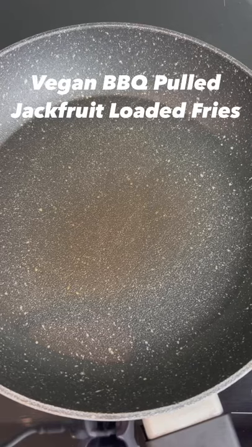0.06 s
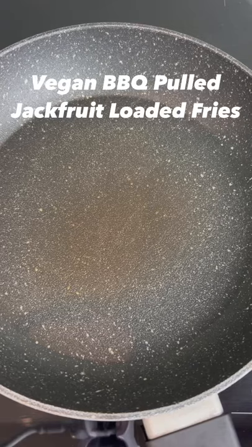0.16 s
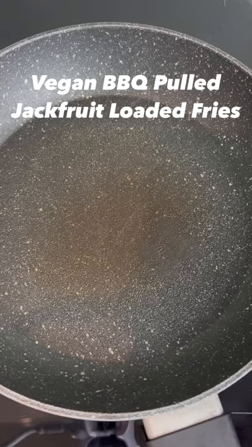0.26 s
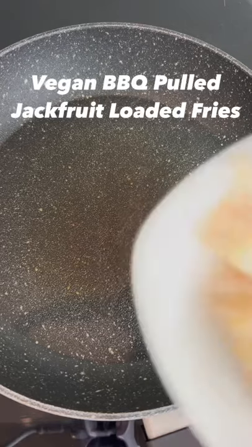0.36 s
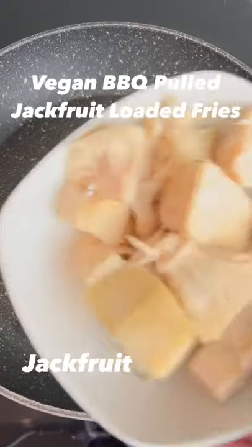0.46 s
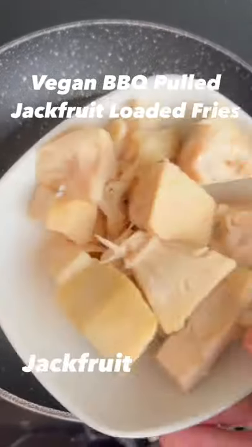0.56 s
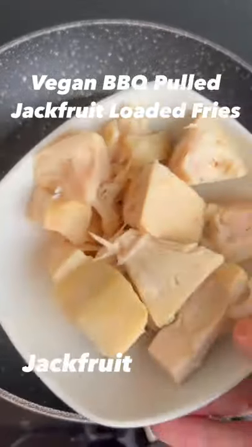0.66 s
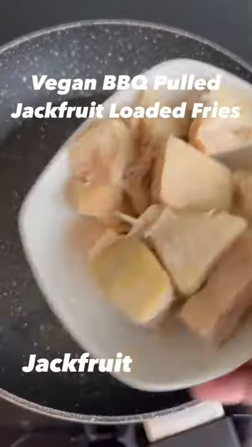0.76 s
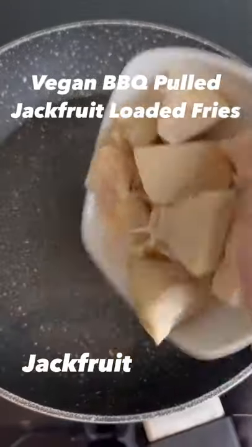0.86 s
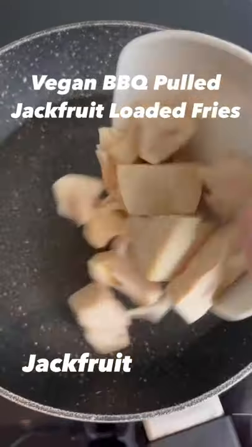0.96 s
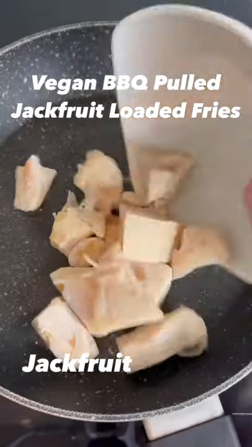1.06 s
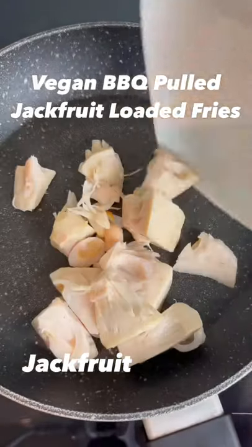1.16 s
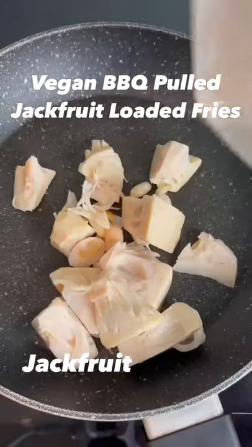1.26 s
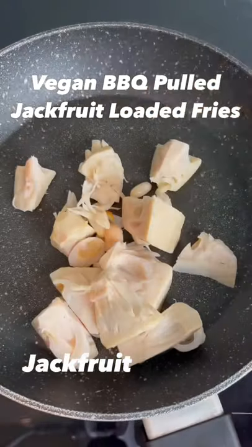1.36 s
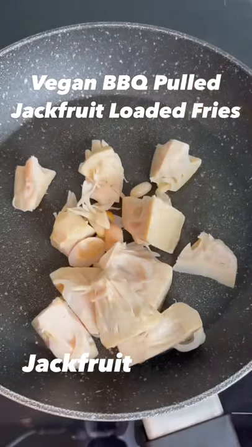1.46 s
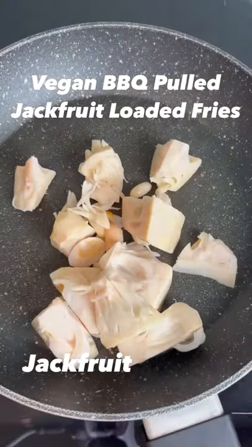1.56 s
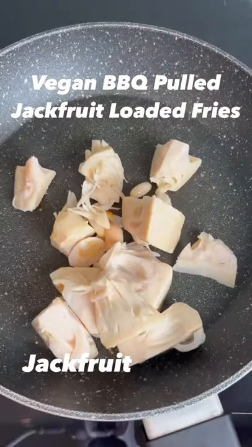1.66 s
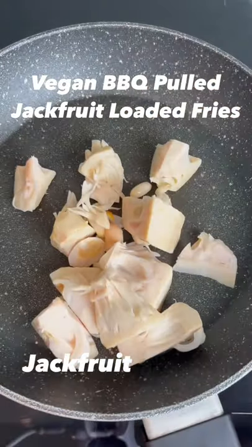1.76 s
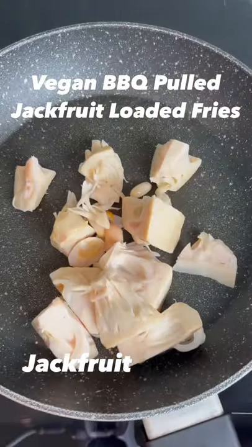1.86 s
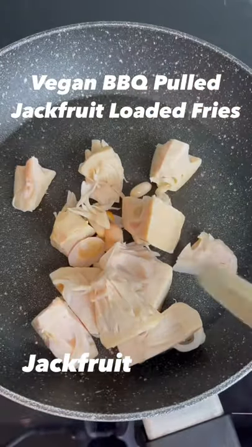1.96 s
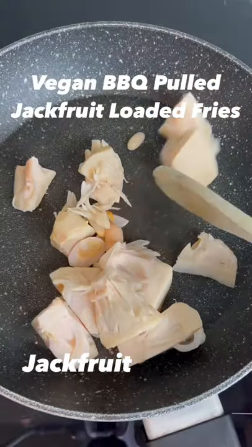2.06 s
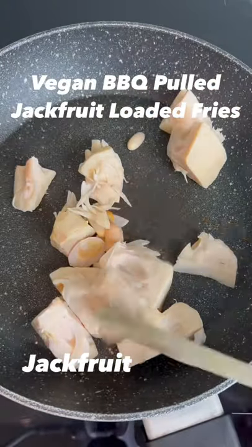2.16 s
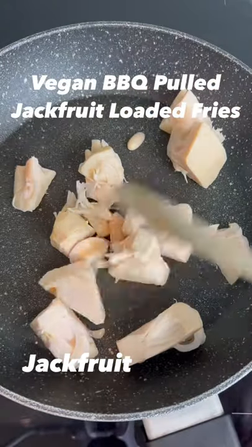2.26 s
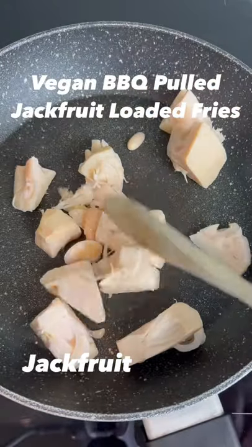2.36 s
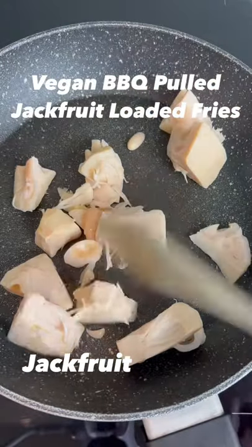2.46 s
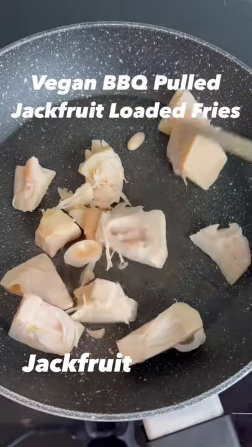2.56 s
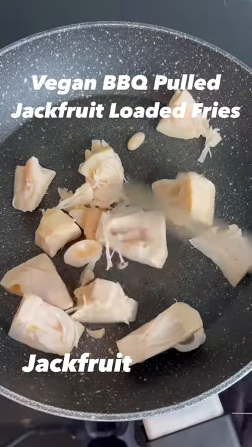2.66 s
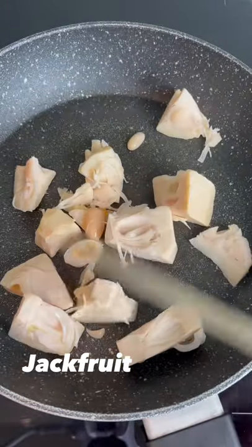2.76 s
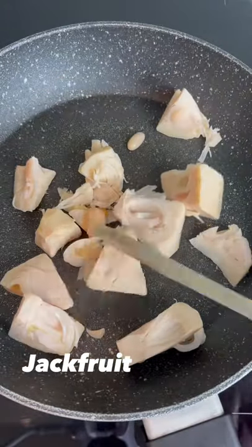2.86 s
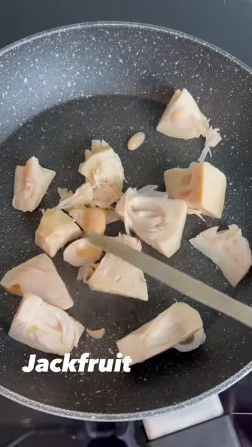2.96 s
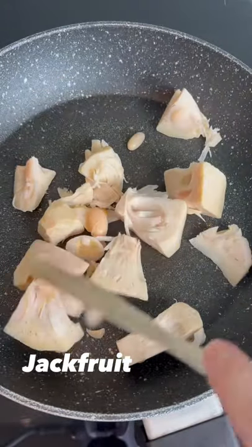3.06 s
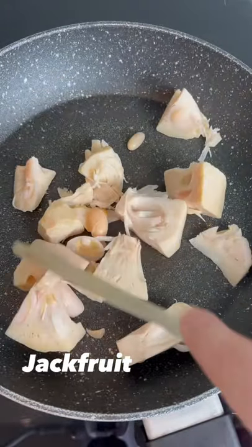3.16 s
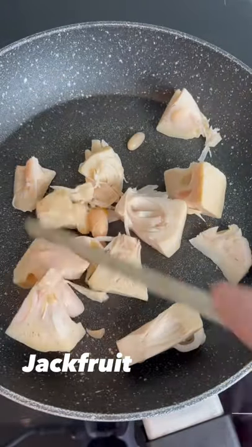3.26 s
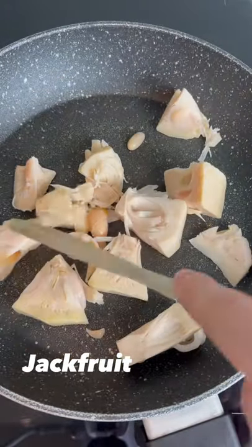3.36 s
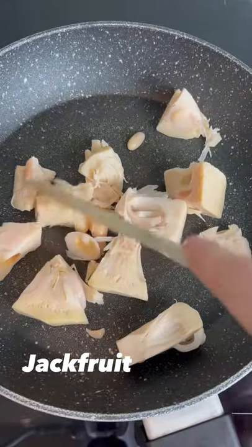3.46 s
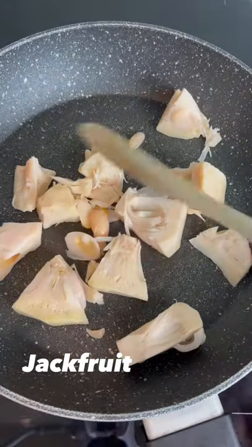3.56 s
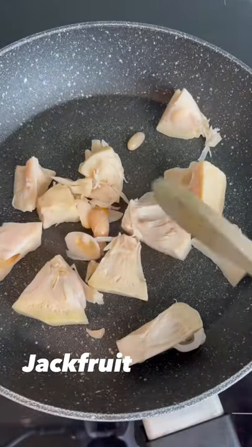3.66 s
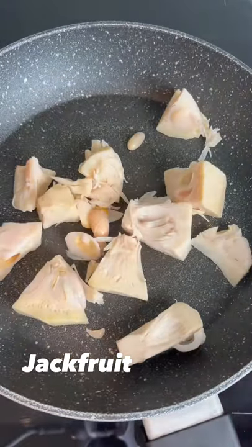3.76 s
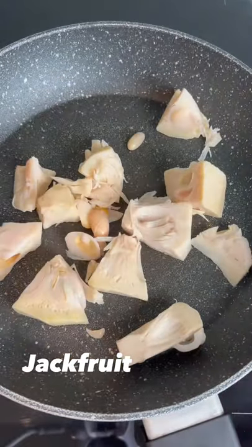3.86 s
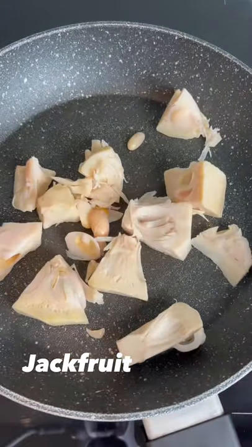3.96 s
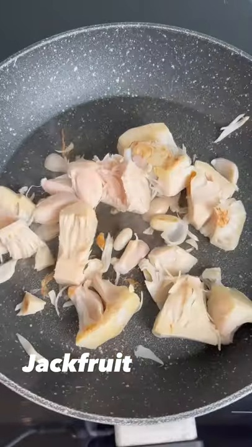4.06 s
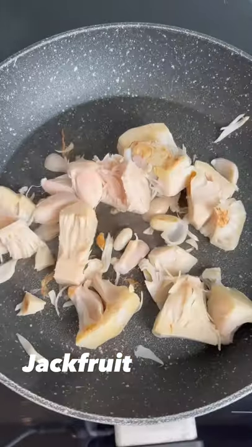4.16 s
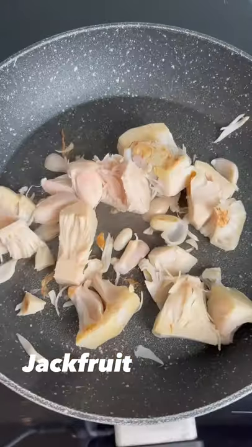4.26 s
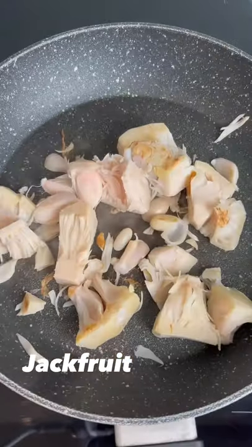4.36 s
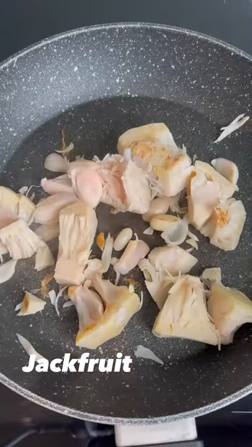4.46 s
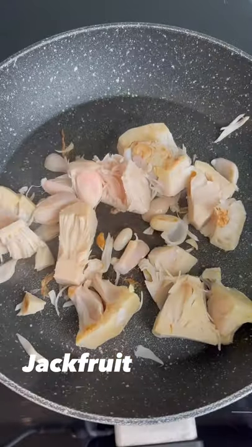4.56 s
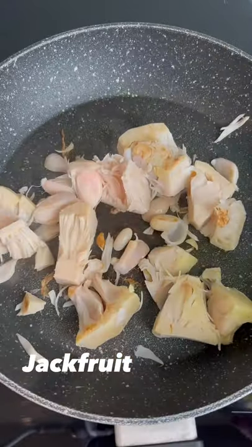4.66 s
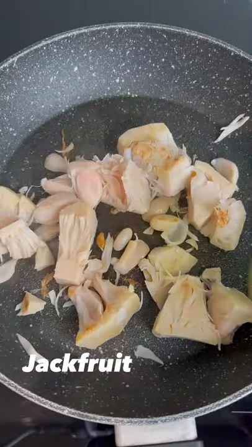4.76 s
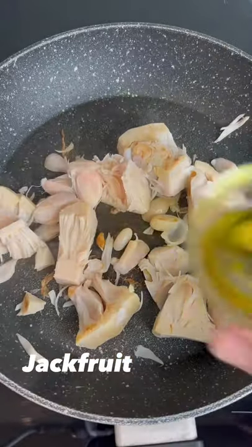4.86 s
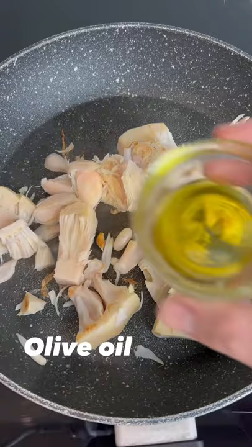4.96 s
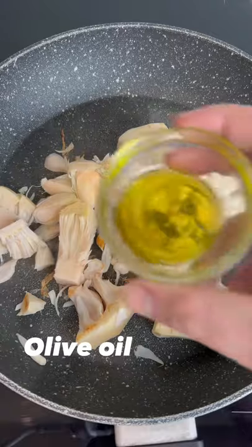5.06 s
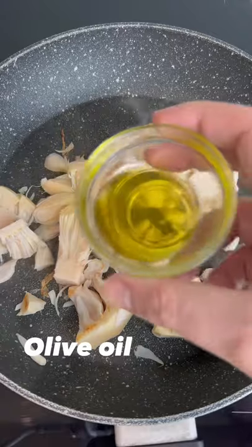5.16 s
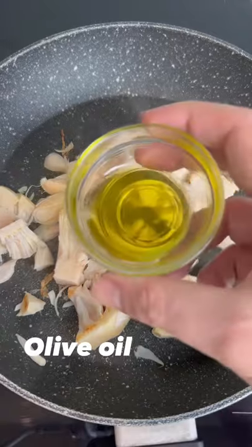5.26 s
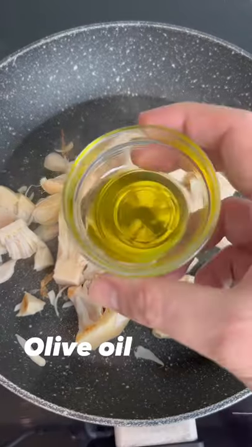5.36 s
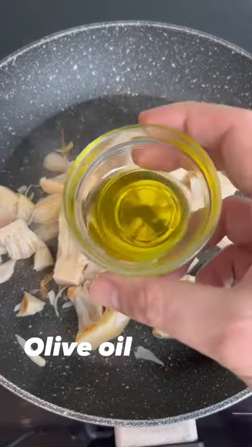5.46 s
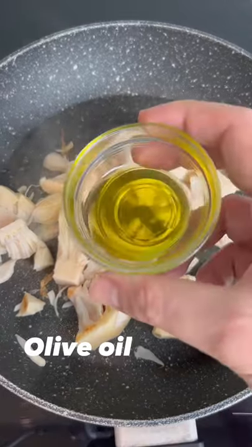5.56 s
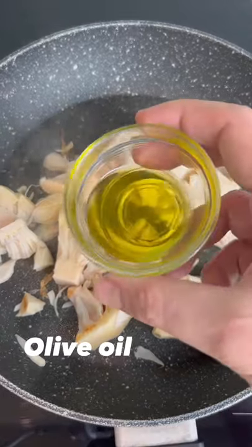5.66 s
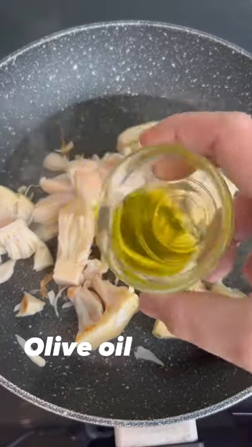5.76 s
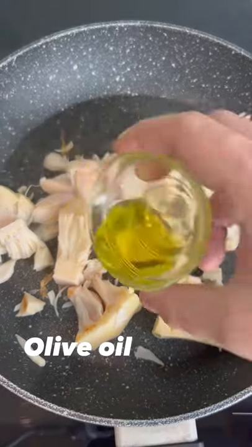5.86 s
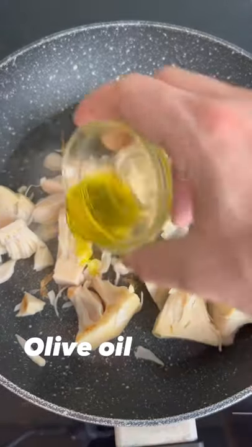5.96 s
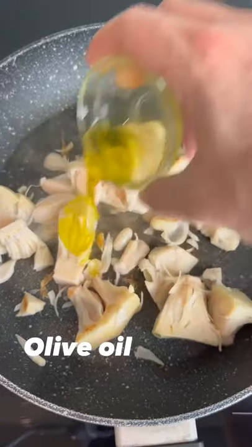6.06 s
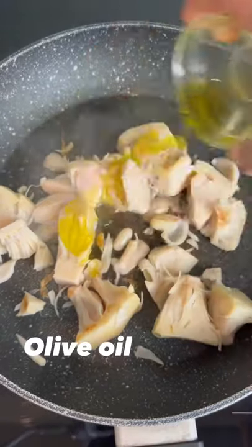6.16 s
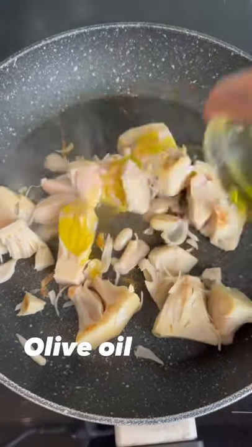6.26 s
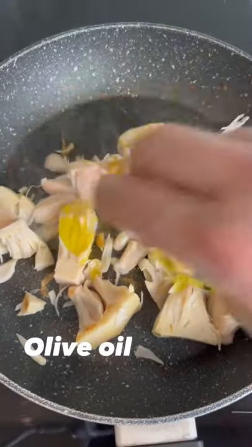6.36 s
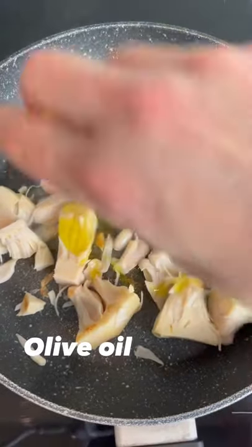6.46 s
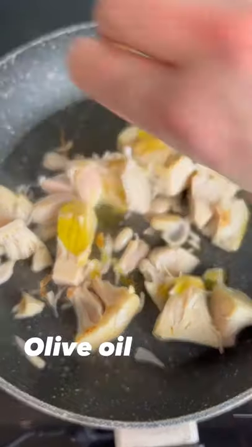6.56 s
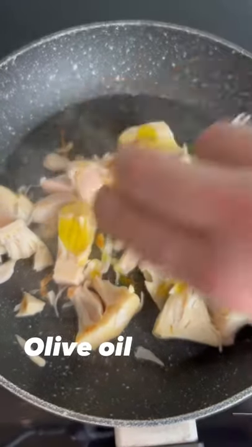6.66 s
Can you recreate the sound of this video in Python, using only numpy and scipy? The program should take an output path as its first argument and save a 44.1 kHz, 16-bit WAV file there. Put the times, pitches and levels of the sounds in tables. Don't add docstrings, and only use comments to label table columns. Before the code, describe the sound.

A close stereo phone pickup above a hot pan in a small kitchen. From 0 to 0.9 s it is nearly quiet: low hob hum with a thin high whine, a tiny opening scuff, faint hand rubs on a bowl and, from 0.6 s, small drips. Around 0.93-1.25 s wet chunks land with soft low thuds and sharp ticks; thin, spitting steam begins at 0.97 s and swells into a full bright hiss by 1.26 s. At 1.93 s a cut drops to a steadier, softer sizzle. Spatula clicks come near 2.26-2.3 s and faintly around 3.2-3.3 s, with short steam flares at 2.3, 2.8 and 3.2 s. At 4.03 s another cut brings a calmer hiss under a low tonal hood fan with airy rumble. It dips near 5.9 s, then oil flares from 6.2 s with crackles and whistling jets, growing louder until the end.

```python
import sys
import numpy as np
from scipy import signal
from scipy.fft import rfft, irfft, next_fast_len
from scipy.io import wavfile
from scipy.ndimage import uniform_filter1d, map_coordinates

SR = 44100
rng = np.random.default_rng(int(sys.argv[2]) if len(sys.argv) > 2 else 0)


def transcribe(u):
    v = np.clip(np.atleast_2d(u).T, -1, 1)
    q = np.round(v * 32767).astype(np.int16)
    wavfile.write(sys.argv[1], SR, q)


def ratio(d):
    e = np.asarray(d, float) / 20
    return 10 ** e


N = 295911
T = np.arange(N) / SR

TAKE_EDGES = [-0.002, 1.928, 4.032, 7]

# (frequency [Hz], level [dB])
STEAM_MID = [
    [(180, -63), (300, -23), (421, -20.5), (601, -14.5), (926, -17), (1690, -7.5), (2030, -4), (2640, -5.5),
     (3280, -1.5), (5130, -5), (6080, 0), (8290, -1), (12000, -4.5), (12900, -15), (16000, -22)],
    [(180, -56), (300, -19.5), (734, -15.5), (831, -12.5), (926, -16.5), (1320, -9.5), (1690, -11),
     (1880, -6), (2600, -6.5), (3380, -3), (5130, -3), (6080, 1), (12000, -2.5), (12900, -15),
     (16000, -17.5)],
    [(650, -19), (1100, -10.5), (1670, -9), (1910, -8), (2310, -10.5), (2840, -6), (4120, -5), (5030, -6.5),
     (5450, -2.5), (6140, -2), (8130, -3.5), (9920, -6.5), (12000, -6), (12900, -16), (16000, -23.5)],
]
# (frequency [Hz], level [dB])
STEAM_SIDE = [(200, -10), (900, -6.5), (1400, -14), (2000, -17.5), (3000, -15), (3900, -16), (4300, -9.5),
              (5000, 1), (5600, -9), (5900, -22), (7900, -25), (8300, -6), (10500, 0.5), (12300, 8.5),
              (13000, 15), (16000, 16)]
STEAM_SIDE_DB = [0, 0, 1]
# (frequency [Hz], width [Hz], level [dB])
PAN_WAVES = [(2430, 30, 2), (3200, 120, 0.5), (4176, 28, 3), (5100, 116, -3.5), (6010, 110, 1.5),
             (6980, 100, 0.5), (8470, 140, 1), (9920, 480, -2.5)]
# (time [s], level [dB])
BOIL = [
    [(.972, -50.5), (1.01, -37.5), (1.13, -30), (1.262, -27.5), (1.92, -30.5)],
    [(1.94, -37.5), (2.14, -39.5), (2.32, -34.5), (2.5, -37.5), (2.83, -35.5), (3.16, -35), (4.02, -37.5)],
    [(4.04, -42.5), (4.6, -40.5), (5.91, -44.5), (6.11, -43), (6.3, -38.5), (6.71, -35)],
]
TAKE_BODY_DB = [-0.15, 0.5, .3]
TAKE_SPIT_DB = [1.5, -0.2, -0.6]
# (time [s], extra level [dB])
PRESSES = [
    (1.3, 0),
    (2.305, 3),
    (2.83, 3),
    (3.162, 4.5),
    (3.292, 3),
    (6.25, 1),
    (6.36, 1.5),
    (6.5, 0.5),
]

# (time [s], level [dB], frequency [Hz])
JETS = [(1.149, -46, 2420), (1.25, -49, 2430), (1.73, -39.5, 3150), (2.308, -40, 3920), (2.399, -44, 3690),
        (2.83, -48.5, 3200), (4.85, -52, 6900), (6.2, -43.5, 7030), (6.43, -49.5, 1876), (6.485, -48, 1880),
        (6.54, -48.5, 1880), (6.62, -49, 2090), (6.62, -45, 11700), (6.68, -40, 6300)]
# (time [s], level [dB], frequency [Hz])
SPURTS = [(.03, -61, 4500), (.032, -66, 2670), (.98, -54, 380), (1.01, -61, 1186), (1.049, -65, 1504),
          (1.094, -47.5, 678), (3.17, -45, 4050), (6.26, -39, 6730), (6.279, -50, 4500), (6.351, -38, 7000),
          (6.35, -47, 4020), (6.386, -41, 5700), (6.44, -43, 11200), (6.46, -38, 5970), (6.505, -39, 11500),
          (6.52, -38, 6220), (6.611, -44, 4540)]
# (time [s], peak level [dB], frequency [Hz])
FIRST_DROPS = [
    (.633, -49, 11500),
    (.822, -65, 11000),
    (.845, -65, 10000),
    (.865, -57, 7500),
    (.892, -59, 11500),
    (0.932, -38, 1010),
    (.935, -44, 9000),
]
# (time [s], peak level [dB], frequency [Hz])
TICKS = [(0.9757, -34, 7550), (1.0896, -21, 6840), (2.2579, -19, 8000), (2.2684, -23, 8400),
         (2.305, -18.5, 7800), (3.1594, -37, 4100), (3.3444, -34, 6010), (6.278, -28, 4450),
         (6.349, -30, 3900), (6.4407, -19.5, 7060), (6.608, -29, 4500), (6.4996, -30, 6140),
         (6.5594, -22, 6320)]
# (time [s], peak level [dB], frequency [Hz], knock level [dB])
THUDS = [(.928, -34, 52, -20), (.97, -45, 231, -1), (.99, -30.5, 65.5, -10.5), (0.99, -38.5, 149, -20),
         (1.085, -54, 60, 3), (1.106, -33, 63, -11), (1.128, -42, 170, 0), (1.212, -38, 95, -4),
         (1.215, -41.5, 226, -2), (1.25, -38, 70, -17), (2.545, -44.5, 60, -4), (3.6, -37, 55, -30)]
# (start [s], length [s], level [dB])
RUBS = [
    (0, 0.0064, -61.5),
    (0.029, .078, -73.5),
    (.316, .064, -76.5),
    (.655, 0.061, -76),
    (0.746, 0.051, -77),
    (.81, .04, -84),
    (0.857, .022, -71.5),
    (.924, 0.025, -64),
]

# (frequency [Hz], level [dB])
COIL = [(100, -49), (200, -72.5), (300, -71), (400, -72), (500, -71), (600, -72.5), (700, -70.5),
        (1300, -98), (1900, -99)]
# (frequency [Hz], level [dB])
COIL_SIDE = [(500, -90), (5200, -83), (8200, -89), (9200, -85), (14200, -85)]
COIL_DB = [-1.5, -3.5, 0.5]
# (frequency [Hz], level of each overtone [dB])
WHINE = [(3400, -125), (3750, -86), (4400, -89), (4900, -100), (5300, -89), (7300, -90), (9250, -88),
         (9400, -125)]
# (multiple of the blade rate, level [dB])
BLADES = [(1, -91), (3, -65.5), (4, -64), (5, -78), (6, -86), (7, -72), (8, -62.5), (9, -82)]
# (frequency [Hz], level [dB])
HOOD_AIR = [(100, 5), (200, -1.5), (400, 3), (800, 0.5), (1500, -16), (4000, -13)]
# (frequency [Hz], level [dB])
ROOM = [(25, -11), (45, 3.5), (70, -1.5), (130, -5), (200, -10.5), (230, -1), (270, -19), (500, -17),
        (750, -25), (880, -39.5), (3300, -48.5), (3800, -42), (4900, -53), (5500, -49), (8400, -43),
        (9300, -54), (11000, -43), (14300, -45), (15000, -70)]
# (frequency [Hz], likeness)
ROOM_ALIKE = [(60, 1), (200, 0.96), (500, -0.38), (3000, 0.026), (5200, 0.21), (5800, .97), (7400, 0.81),
              (8000, 0.071), (9500, 0.15), (10500, -0.46), (12300, -0.69), (12700, -1.2)]
ROOM_DB = [-55, -58.5, -57]

BUZZ_HZ = 99.93
CONTACT_S = 0.96


def unit(x):
    return x / np.sqrt(np.mean(x ** 2) + 1e-20)


def along(points, hz):
    f, v = np.transpose(points)
    return np.interp(np.log(hz + 1), np.log(f + 1), v)


def take(index):
    fade_in = np.clip((T - TAKE_EDGES[index]) / 0.0093 + 0.5, 0, 1)
    fade_out = np.clip((TAKE_EDGES[index + 1] - T) / 0.0074 + 0.5, 0, 1)
    return fade_in * fade_out


def by_take(levels_db):
    return sum(take(index=k) * ratio(db) for k, db in enumerate(levels_db))


def wobble(rate):
    steps = np.arange(0, N + 64, 64)
    knots = rng.standard_normal(int(N * rate / SR) + 5)
    return np.interp(np.arange(N), steps, map_coordinates(knots, [steps * rate / SR]))


def filtered(x, response):
    m = next_fast_len(N + 8192)
    return irfft(rfft(x, m) * response(np.fft.rfftfreq(m, 1 / SR)), m)[..., :N]


def stereo(mid, side):
    return np.array([mid + side, mid - side])


def rush(spectrum, alike):
    def shape(hz):
        turn = np.arccos(np.clip(along(alike, hz), -1, 1)) / 2
        return ratio(along(spectrum, hz)) * np.array([np.cos(turn), np.sin(turn)])
    return unit(stereo(*filtered(rng.standard_normal((2, N)), shape)))


def bursts(rate, spread_db, life_s):
    happens = rng.random(N) < rate / SR
    size = happens * ratio(spread_db * np.minimum(rng.exponential(size=N), np.e))
    puff = np.exp(-np.arange(round(6 * life_s * SR) + 2) / (life_s * SR))
    return unit(signal.fftconvolve(size, puff)[:N])


def squeaks(rate, cycles):
    start, pitch, size = rng.random((round(rate * N / SR), 3)).T
    hz, t = (1000 + 13000 * pitch)[:, None], np.arange(1200) / SR
    swell = (hz * t / cycles) * np.exp(-hz * t / cycles)
    ring = np.sqrt(-np.log(size))[:, None] * np.sin(2 * np.pi * hz * t) * swell
    at = (start * N).astype(int)[:, None] + np.arange(len(t))
    return unit(np.bincount(at.ravel(), ring.ravel(), N + len(t))[:N])


def patchy(x, patchy_db):
    z = signal.stft(x, nperseg=512)[2]
    field = rng.standard_normal(z.shape[1:])
    field = uniform_filter1d(uniform_filter1d(field, size=5, axis=0), size=9, axis=1)
    return signal.istft(z * ratio(patchy_db * unit(field)), nperseg=512)[1][:, :N]


def boiling_juice():
    throb_db = 0.33 * np.sin(2 * np.pi * BUZZ_HZ * T)
    flutter = ratio(0.43 * wobble(7) + 0.61 * wobble(25) + throb_db)
    gate = 3 + 0.34 * bursts(rate=460, spread_db=4, life_s=0.00087)
    gate += 0.33 * bursts(rate=400, spread_db=3.5, life_s=0.00017)
    gate += 0.14 * bursts(rate=60, spread_db=1, life_s=0.0026)
    steam = patchy(flutter * gate * rng.standard_normal((2, N)), patchy_db=1)
    return steam + 0.6 * np.array([squeaks(rate=500, cycles=35), squeaks(rate=550, cycles=27)])


def pan_and_ports(steam):
    def lag(hz):
        return 1j * 0.65 * (hz > 4000)

    def waves(hz):
        return ratio(sum(db / (1 + ((hz - centre) / width) ** 2) for centre, width, db in PAN_WAVES))
    own = filtered(steam[1], lambda hz: np.sqrt(1 - np.abs(lag(hz)) ** 2))
    steam[1] = filtered(steam[0], lag) + own
    return filtered(steam, waves)


def sizzle():
    steam = pan_and_ports(boiling_juice())
    since = np.maximum(T - CONTACT_S, 0)
    thin_db = -21 * np.exp(-since / 0.064)
    fresh_spit_db = 10 * np.exp(-since / 0.1)
    oil = np.clip((T - 6.12) / 0.23, 0, 1)
    rise_s, fall_s = 0.0094, 0.012
    press_db = sum(db * np.exp(-np.maximum((s - T) / rise_s, (T - s) / fall_s)) for s, db in PRESSES)
    out = 0
    for k in range(len(BOIL)):
        def colour(hz):
            opposite_db = along(STEAM_SIDE, hz) + STEAM_SIDE_DB[k]
            return ratio(along(STEAM_MID[k], hz) + np.array([0 * hz, opposite_db]))
        pair = filtered(steam, colour)
        pair /= np.std(pair[0])
        times, levels_db = np.transpose(BOIL[k])
        steam_db = np.interp(T, times, levels_db)
        swing_db = steam_db - np.median(levels_db)
        body_db = TAKE_BODY_DB[k] - 0.38 * swing_db + thin_db + 2.5 * oil
        spit_db = TAKE_SPIT_DB[k] + fresh_spit_db + 3.5 * oil
        body = filtered(pair, lambda hz: 1 / (1 + (hz / 2300) ** 4))
        spit = filtered(pair, lambda hz: 1 / (1 + (9500 / (hz + 1)) ** 8))
        pair += (ratio(body_db) - 1) * body + (ratio(spit_db) - 1) * spit
        out += take(index=k) * ratio(steam_db + press_db) * pair
    first_contact = np.clip((T - CONTACT_S) / 0.019, 0, 1)
    return first_contact * stereo(*out)


def steam_jets():
    out, t = np.zeros(N + SR), np.arange(-SR // 8, SR // 8) / SR
    jets = [(*row, 0.03) for row in JETS]
    spurts = [(*row, 0.009) for row in SPURTS]
    for s, db, hz, spread_s in jets + spurts:
        width_hz = 125 + 0.13 * hz
        lowpass = signal.butter(2, width_hz / SR, output="sos")
        drift = signal.sosfilt(lowpass, rng.standard_normal((2, len(t))))
        jet = unit(drift[0] * np.sin(2 * np.pi * hz * t) + drift[1] * np.cos(2 * np.pi * hz * t))
        out[round(s * SR):][:len(t)] += ratio(db) * jet * np.exp(-0.5 * (t / spread_s) ** 2)
    return out[SR // 8:][:N]


def ticks():
    out, t = np.zeros((2, N + SR)), np.arange(SR // 16) / SR
    drops = [(*row, 0.0084) for row in FIRST_DROPS]
    contacts = [(*row, 0.01) for row in TICKS]
    for s, db, hz, t60 in drops + contacts:
        crack = np.diff(rng.standard_normal((2, len(t) + 1))) * ratio(-60 * t / 0.015)
        ring = np.sin(2 * np.pi * hz * t) * ratio(-60 * t / t60)
        tick = 0.68 * crack * [[1], [0.7]] + ring * [[1], [0]]
        out[:, round(s * SR):][:, :len(t)] += ratio(db - 4.5) * tick
    return stereo(*filtered(out[:, :N], lambda hz: np.array([1 / (1 + (hz / 11500) ** 16), hz > 8200])))


def thuds():
    out, t = np.zeros(N + SR), np.arange(SR // 4) / SR
    dull = signal.butter(2, [140, 450], "band", fs=SR, output="sos")
    for s, db, hz, knock_db in THUDS:
        t60 = 0.1 * ratio(0.25 * (db + 38.5))
        swing = ratio(-60 * t / t60) * np.sin(2 * np.pi * hz * t) * (1 - np.exp(-t / 0.021))
        noise = unit(signal.sosfilt(dull, rng.standard_normal(len(t))))
        knock = ratio(knock_db - 9 - 60 * t / 0.092) * noise * (1 - np.exp(-t / 0.0049))
        out[round(s * SR):][:len(t)] += ratio(db + 8) * (swing + knock)
    return out[:N]


def rustle():
    rub = 0
    for s, length, db in RUBS:
        rub = rub + ratio(db) * np.clip(np.minimum(T - s, s + length - T) / 0.008 + 0.5, 0, 1)
    dull = rush([(700, -34), (950, 0), (3500, -7.5), (4500, -20), (6000, -88)], [(1000, 0.7)])
    bright = rush([(3000, -28), (3700, -2.5), (5500, -3), (8500, -4), (9300, -33), (11000, -90)],
                  [(5000, 0.34), (5800, 0.8)])
    dull_gain = rub + ratio(-90)
    bright_gain = ratio(-4) * rub + ratio(-78)
    return (T < CONTACT_S) * (dull_gain * dull + bright_gain * bright)


def tones(lines, unsteady_db):
    out = np.zeros(N)
    for hz, db in lines:
        level = np.sqrt(2) * ratio(db + unsteady_db * wobble(5.3))
        out += level * np.sin(2 * np.pi * (hz * T + rng.random()))
    return out


def whine():
    beat = np.diff(np.floor(np.arange(N + 1) * BUZZ_HZ / SR)) * SR / BUZZ_HZ / np.sqrt(2)
    size, phase = rng.standard_normal((2, SR // 100))
    uneven = ratio(3.5 * size) * np.exp(1j * 1.1 * phase)

    def comb(hz):
        return ratio(along(WHINE, hz)) * uneven[np.round(hz / BUZZ_HZ).astype(int)]
    return ratio(2.5 * wobble(3)) * filtered(beat, comb)


def hob():
    def buzz(lines):
        return tones([(round(hz / BUZZ_HZ) * BUZZ_HZ, db) for hz, db in lines], unsteady_db=1.0)
    return by_take(COIL_DB) * stereo(buzz(COIL) + whine(), buzz(COIL_SIDE))


def hood():
    blade_hz = 122.4
    lines = [(k * blade_hz, db) for k, db in BLADES]
    blades = stereo(tones(lines, unsteady_db=1.85), ratio(-10.5) * tones(lines, unsteady_db=1.85))
    air = ratio(-55.5) * rush(HOOD_AIR, [(200, 1.0), (700, 0.78), (2000, 0.95)])
    return take(index=2) * (blades + air)


def room_tone():
    return by_take(ROOM_DB) * rush(ROOM, ROOM_ALIKE)


def scene():
    cooking = sizzle() + steam_jets() + ticks() + thuds() + rustle()
    return cooking + hob() + hood() + room_tone()


def band_limit(x):
    return signal.sosfilt(signal.butter(12, 16340, fs=SR, output="sos"), x)


def record(dry):
    return band_limit(dry)


dry = scene()
out = record(dry)
transcribe(out)
```